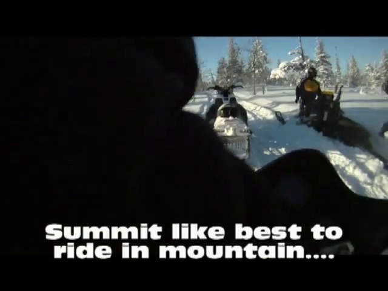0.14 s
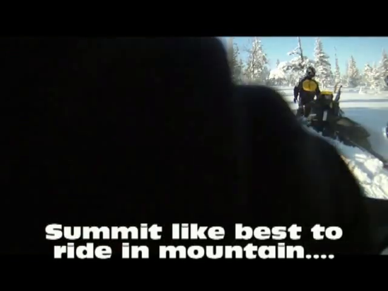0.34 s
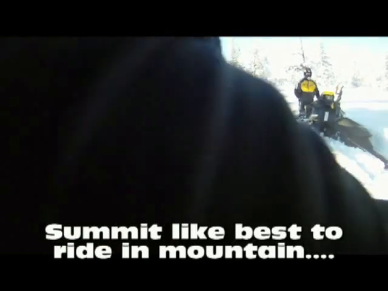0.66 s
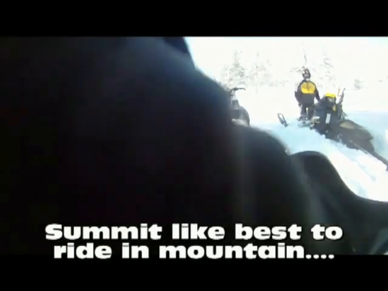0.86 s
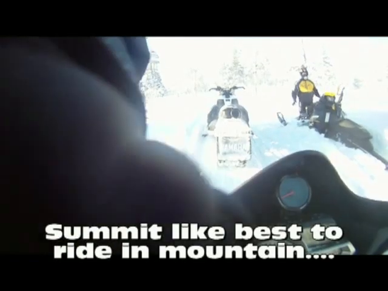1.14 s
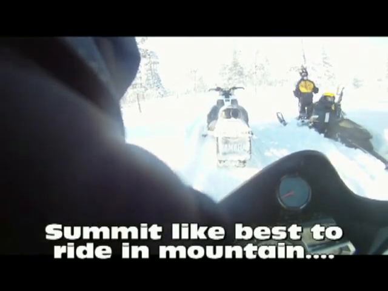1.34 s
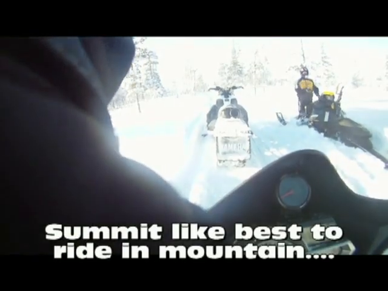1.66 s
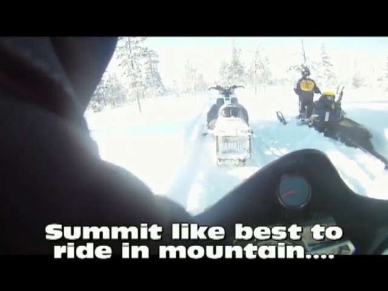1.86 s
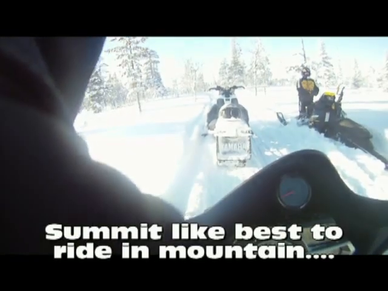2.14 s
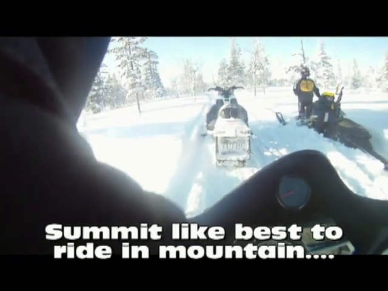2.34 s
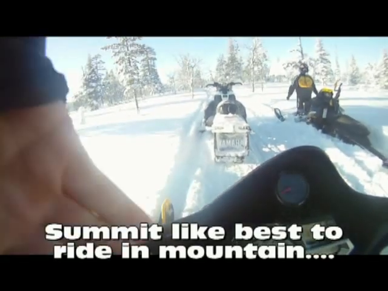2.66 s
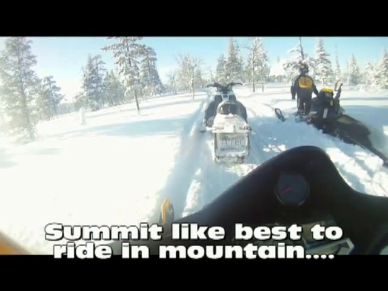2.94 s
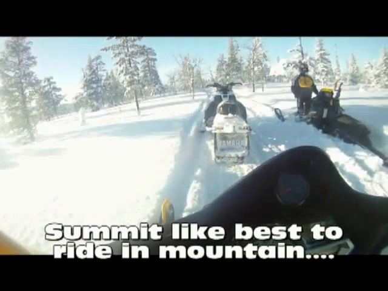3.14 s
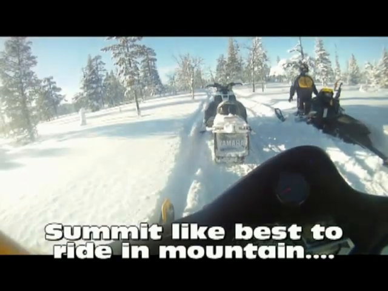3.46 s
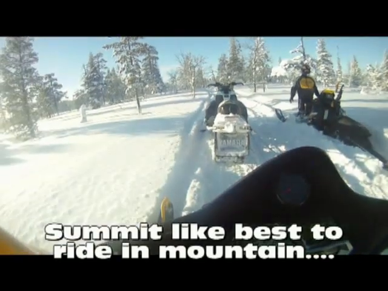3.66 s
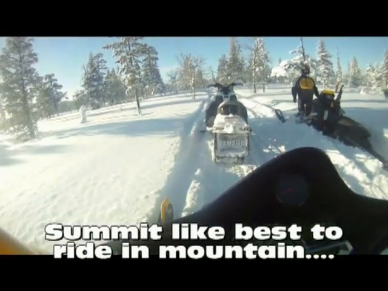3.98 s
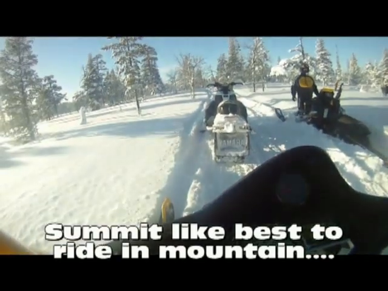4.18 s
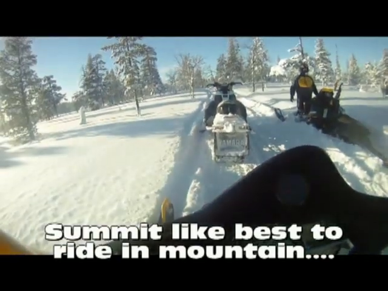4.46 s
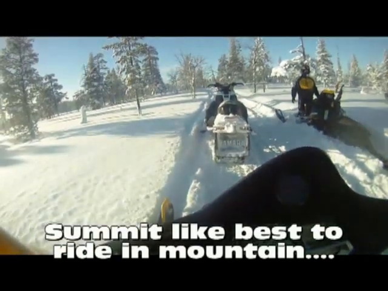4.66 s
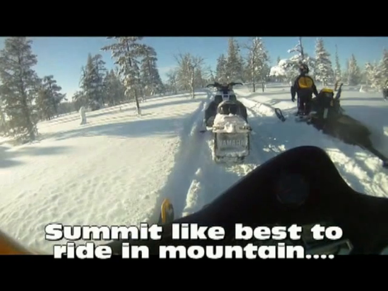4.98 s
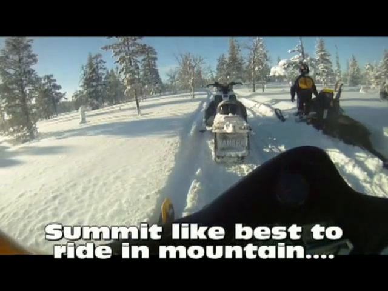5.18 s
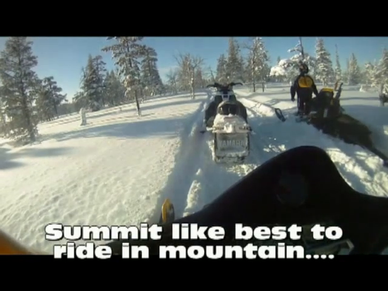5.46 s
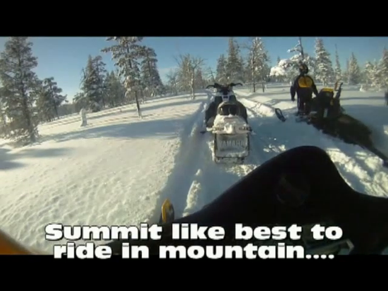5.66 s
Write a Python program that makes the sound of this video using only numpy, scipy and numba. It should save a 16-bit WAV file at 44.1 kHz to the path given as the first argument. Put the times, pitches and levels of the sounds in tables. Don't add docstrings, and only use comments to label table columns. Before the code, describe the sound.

A two-stroke snowmobile idles steadily close by with a low, lumpy putter, while cloth rustles and hard ticks knock the microphone's plastic case.

```python
import sys
import numpy as np
from scipy import signal
from scipy.fft import rfft, irfft
from scipy.io import wavfile
from scipy.ndimage import uniform_filter1d
from numba import njit

SR = 44100
rng = np.random.default_rng(int(sys.argv[2]) if len(sys.argv) > 2 else 0)


def amplitude_ratio(level_db):
    exponent = np.asarray(level_db, float) / 20
    return 10 ** exponent


def file_out(sig):
    cols = np.atleast_2d(sig).T
    lim = np.clip(cols, -1, 1)
    pcm = np.round(lim * 32767).astype(np.int16)
    wavfile.write(sys.argv[1], SR, pcm)


N = 256662

# time_s, firing_hz
IDLE_SPEED = [(0.0, 40.06), (0.66, 41.27), (0.94, 40.58), (1.31, 41.53), (1.77, 40.61), (2.8, 40.71),
              (3.18, 41.21), (3.6, 40.27), (4.24, 41.35), (4.63, 40.32), (5.25, 41.49), (5.82, 40.39)]
START_TURN = 0.48
# lag_ms, pitch_hz, width_hz, strong_gain, weak_gain
PIPE_PATHS = [
    (-18.6, 163.5, 25, -.17, -.04),
    (-2.5, 169.6, 63, -.24, -.03),
    (-6.4, 268.5, 94, 0, .18),
    (-5, 259, 141, -.21, .04),
]
# lag_ms, pitch_hz, width_hz, strong_gain, weak_gain
BODY_PATHS = [
    (-2.5, 45.4, 20.7, 0.022, 0.026),
    (-5, 462.8, 100, 0.018, 0.022),
    (-7.5, 121.1, 45, 0.031, 0.023),
]
# time_s, extra_db
HARD_FIRINGS = [(.037, 5.5), (.285, 5), (.531, 3.5), (.675, 3.5), (.87, 1.5), (1.019, 4), (1.116, 3.5),
                (1.31, 8), (2.043, 3.5), (2.585, 3), (2.781, 4), (5.52, 2.5)]
EXHAUST_DB, SCATTER_DB = -16.5, 1.3
JITTER_MS, WANDER_MS = 0.4, 0.6
# pitch_hz, density_db (per Hz)
RUMBLE_SPECTRUM = [(18, -48), (30, -32), (65, 0.5), (119, -3.5), (173, -4.5), (220, -9), (297, -8.5),
                   (352, -10), (631, -16.5), (900, -36.5), (1170, -60), (1980, -120)]
# pitch_hz, density_db (per Hz)
CLATTER_SPECTRUM = [(470, -4), (800, -3), (856, 1.5), (939, -4.5), (1120, 1), (1530, -3), (1670, -2.5),
                    (2110, 2.5), (2410, -6), (3330, -4.5), (4180, -15.5), (4900, -14), (6000, -22.5),
                    (7800, -58), (13200, -120)]
RUMBLE_DB, CLATTER_DB = -24, -41
SHADE_DB, ARM_UP_S, ARM_DOWN_S, ARM_MOVE_S = -2.5, 0.66, 2.65, 0.47
# start_s, lowest_mode_db, upper_voices_db, spot (0 dull to 3 dry crack)
CASE_TICKS = [(0.0687, -25, -38, 0), (0.5392, -39, -15, 3), (0.7836, -40, -27, .5), (0.9102, -15, 1, .85),
              (1.1164, -49, -29.5, 0), (1.2704, -34, -30, 0), (1.8402, -36, -30, .3),
              (2.0423, -33, -20, .45), (2.795, -30, -9, 1.85), (2.8464, -37, -17, 2), (2.8604, -40, -24, 2),
              (2.8664, -43, -20, 2), (2.9282, -12, -4, 2.1), (2.9946, -40, -24, 1), (3.0054, -43, -28, 1.3),
              (3.0335, -38, -30, 1.6), (3.0619, -37, -22, 1.3), (3.6142, -40, -21, 2.5),
              (3.7308, -34, -27, 2.1), (4.0013, -48, -15, 2.1), (4.1485, -35, -22, 2),
              (4.588, -30, -15, 2.1), (4.5885, -40, -25, 0), (4.9054, -27, -26, 2), (4.9165, -32, -14, 3),
              (4.935, -45, -28, 2), (5.1194, -41, -30, .9)]
# pitch_hz, partner_hz, t60_s
CASE_MODES = [
    (694.5, 730, 0.058),
    (1315.6, 1581, 0.017),
    (2223, 2465, 0.011),
    (3030, 3420, 0.017),
]
CRACK_S, FALL_DB_PER_SPOT = 0.0009, 16
# middle_s, length_s, level_db
SLEEVE_STROKES = [(0.027, 0.071, -40.5), (0.113, 0.014, -40), (0.18, 0.045, -39.5), (0.227, 0.041, -39.5),
                  (0.302, 0.037, -34), (1.212, 0.068, -37), (1.29, 0.062, -40.5), (1.4, 0.033, -40),
                  (1.81, 0.049, -44.5), (1.86, .04, -48), (2.051, 0.033, -44), (2.861, 0.039, -41),
                  (3.005, 0.04, -41), (3.084, 0.052, -48.5), (3.748, 0.031, -38), (3.892, 0.061, -38.5),
                  (4.536, .05, -39.5), (4.682, 0.11, -42.5), (4.781, .08, -41.5), (5.501, .06, -45),
                  (5.721, 0.062, -49)]
# pitch_hz, density_db (per Hz)
CLOTH_SPECTRUM = [(530, -21), (900, -2), (1650, -8), (1940, -5.5), (2590, -6), (3550, -5.5), (5120, -15),
                  (6000, -20.5), (7800, -59), (13200, -120)]
# time_s, firing_hz, level_db
NEAR_SLED = [
    (0, 37.1, -33),
    (.5, 37.07, -36),
    (1.4, 37.8, -29),
    (2.5, 36.54, -34.5),
    (4.2, 37.44, -31.5),
    (5.82, 37.48, -29),
]
# multiple (of its firing rate), level_db
NEAR_PARTIALS = [
    (1, -12.5),
    (1.5, 0),
    (2, 1.5),
    (3, 2),
    (4, -23),
    (5, -4.5),
]
# time_s, drone_hz, level_db
FAR_SLED = [
    (0, 69.44, -42),
    (.7, 71.4, -19.5),
    (2, 70.28, -22.5),
    (3, 70.4, -23),
    (4.3, 70.2, -24.5),
    (5.82, 67.7, -35),
]
HUM_DB = -36.5
DUCK_TOP, DUCK_RELEASE_S, DUCK_DEPTH, DUCK_HZ, DUCK_TICK_SHARE = 0.55, 0.055, 1.8, 380, 0.55
SAMPLE_HOLD = (40, 147, 4, 160)
# pitch_hz, threshold_db
PATCH_THRESHOLDS = [(10000, -88), (11000, -77), (11300, -84), (12600, -84), (12800, -71.5), (13500, -72),
                    (13750, -82), (14350, -82), (14500, -73.5), (14900, -73.5), (15000, -81), (15250, -81),
                    (15350, -62), (16300, -58), (16700, -30), (22050, -30)]


def level(x, db):
    return x * amplitude_ratio(db) / np.sqrt(np.mean(x ** 2))


def curve(table):
    s, *columns = np.transpose(table)
    return [np.interp(np.arange(N) / SR, s, c) for c in columns]


def ring(x, hz, width_hz, count=1):
    for _ in range(count):
        x = signal.lfilter(*signal.iirpeak(hz, hz / width_hz, SR), x)
    return x


def colour(points):
    hz, db = np.transpose(points)
    log_hz = np.log(np.arange(1, N // 2 + 2) * SR / N)
    spectrum = rfft(rng.standard_normal(N)) * amplitude_ratio(np.interp(log_hz, np.log(hz), db))
    return level(irfft(spectrum, N), 0)


def walk(rate):
    k = int(SR / rate)
    steps = np.repeat(rng.standard_normal(N // k + 1), k)
    return 2.19 * uniform_filter1d(uniform_filter1d(steps, k), k)[:N]


def pulses(s, size):
    at = np.round(s * SR).astype(int)
    keep = (at >= 0) & (at < N)
    return np.bincount(at[keep], size[keep], N)


def exhaust(turn):
    firing = np.arange(1, int(turn[-1]) + 1)
    s = np.interp(firing, turn, np.arange(N) / SR + WANDER_MS / 1000 * walk(9))
    paths = PIPE_PATHS + BODY_PATHS
    force_draw, time_draw, *path_draws = rng.standard_normal((len(firing), len(paths) + 2)).T
    force_db = SCATTER_DB * force_draw
    for at, db in HARD_FIRINGS:
        force_db[np.argmin(abs(s - at))] = db
    out = 0
    for (lag_ms, hz, width_hz, strong, weak), own in zip(paths, path_draws):
        path_db = min(width_hz / 60, 1) * force_db + 0.81 * own
        size = np.where(firing % 2, weak, strong) * amplitude_ratio(path_db)
        answer = ring(np.arange(SR // 5) == 0, hz, width_hz, count=3)
        blow = pulses(s + (lag_ms + JITTER_MS * time_draw) / 1000, size)
        out = out + signal.fftconvolve(blow, answer / abs(answer).max())[:N]
    return level(out, EXHAUST_DB)


def clatter(turn):
    t = np.arange(N) / SR
    arm = (np.tanh((t - ARM_UP_S) / ARM_MOVE_S) - np.tanh((t - ARM_DOWN_S) / ARM_MOVE_S)) / 2
    gate_db = 1.44 * np.cos(4 * np.pi * (turn + 0.12)) + 1.06 * np.cos(2 * np.pi * (turn + 0.27))
    rattle_db = CLATTER_DB + SHADE_DB * arm + 3.0 + gate_db + 0.82 * walk(35)
    rumble_db = RUMBLE_DB + 0.5 * np.cos(np.pi * turn) + 0.99 * walk(12)
    return colour(CLATTER_SPECTRUM) * amplitude_ratio(rattle_db) + colour(RUMBLE_SPECTRUM) * amplitude_ratio(rumble_db)


def ticks():
    s, low_db, upper_db, spot = np.transpose(CASE_TICKS)
    distance = abs(np.arange(len(CASE_MODES))[:, None] - spot)
    *upper, crack_db = upper_db - FALL_DB_PER_SPOT * distance
    t = np.arange(SR // 20) / SR
    scrape = rng.standard_normal(N)
    out = scrape * signal.fftconvolve(pulses(s, amplitude_ratio(crack_db - 12)), np.exp(-t / CRACK_S))[:N]
    for (hz, partner_hz, t60), db in zip(CASE_MODES, [low_db, *upper]):
        pair = np.sin(2 * np.pi * hz * t) + 0.69 * np.sin(2 * np.pi * partner_hz * t)
        shape = pair * np.exp(-np.log(1000) * t / t60) * (1 - np.exp(-t / 0.00062))
        struck = signal.fftconvolve(pulses(s, amplitude_ratio(db + 5.5)), shape)[:N]
        out = out + struck * (1 + 1.9 * ring(scrape, 425, 400))
    return out


def cloth():
    t = np.arange(N) / SR
    stroke = sum(amplitude_ratio(db) * np.exp(-(2 * (t - s) / length) ** 4) for s, length, db in SLEEVE_STROKES)
    return colour(CLOTH_SPECTRUM) * stroke * amplitude_ratio(2.24 * walk(130))


def other_sleds():
    near_hz, near_db = curve(NEAR_SLED)
    near_turn = np.cumsum(near_hz) / SR
    near = 0
    for multiple, db in NEAR_PARTIALS:
        strength = amplitude_ratio(db + 1.4 * walk(8.2))
        near = near + strength * np.sin(2 * np.pi * multiple * near_turn + 0.5 * walk(12))
    far_hz, far_db = curve(FAR_SLED)
    far_turn = np.cumsum(far_hz) / SR
    far = amplitude_ratio(far_db + 1.3 * walk(6)) * np.sin(2 * np.pi * far_turn)
    hum = amplitude_ratio(HUM_DB + 1.8 * walk(3)) * np.sin(2 * np.pi * far_turn * 6 / 7)
    return np.sqrt(2) * (amplitude_ratio(near_db) * near + far + hum)


def scene():
    turn = START_TURN + np.cumsum(curve(IDLE_SPEED)[0]) / SR
    mono = exhaust(turn) + clatter(turn) + ticks() + cloth() + other_sleds()
    return np.array([mono, mono])


@njit
def duck(x, top, release):
    gain, peak = np.empty(len(x)), top
    for i in range(len(x)):
        peak = max(abs(x[i]), peak + (top - peak) * release)
        gain[i] = top / peak
    return gain


def gain_control(x):
    thud = signal.sosfilt(signal.butter(2, DUCK_HZ, fs=SR, output="sos"), x)
    detector = thud + DUCK_TICK_SHARE * (x - thud)
    gain = duck(detector, DUCK_TOP, 1 / (DUCK_RELEASE_S * SR)) ** DUCK_DEPTH
    return x * uniform_filter1d(gain, size=200, origin=99)


def sample_and_hold(x):
    up, down, hold, back = SAMPLE_HOLD
    padded = np.pad(x, (0, down), "edge")
    held = np.repeat(signal.resample_poly(padded, up, down, padtype="edge"), hold)
    return np.clip(signal.resample_poly(held, down, back)[:N], -1, 1)


def converter_error(x):
    mids = np.sqrt(abs(uniform_filter1d(ring(x, 1330, 1170, count=3) ** 2, size=200)))
    return amplitude_ratio(-3.5) * mids * colour([(7000, -46), (9500, 3), (11000, 2.5), (16000, 4.5)])


def drop_patches(x):
    hz, _, cells = signal.stft(x, SR, nperseg=1024)
    power = uniform_filter1d(abs(cells) ** 2, size=9, axis=0)
    threshold_db = np.interp(hz, *np.transpose(PATCH_THRESHOLDS), left=-200)
    cells = cells * (power > amplitude_ratio(2 * threshold_db)[:, None])
    return signal.istft(cells, SR, nperseg=1024)[1][:N]


def channel_error(x):
    noise = colour([(1, 0), (150, 0), (350, -13), (1500, -23), (4000, -31), (12000, -37)])
    return amplitude_ratio(-30) * (walk(45) > 1.4) * x * noise


def top_cut(x):
    return signal.sosfilt(signal.butter(12, 16330, fs=SR, output="sos"), x)


def record(dry):
    x = signal.sosfilt(signal.butter(3, 33, "high", fs=SR, output="sos"), dry[0])
    x = sample_and_hold(gain_control(x))
    x = drop_patches(x + converter_error(x))
    error = channel_error(x)
    return top_cut(np.array([x + error, x - error]))


dry = scene()
out = record(dry)
file_out(out)
```